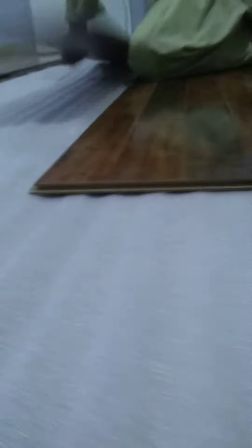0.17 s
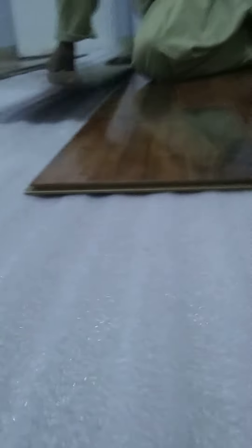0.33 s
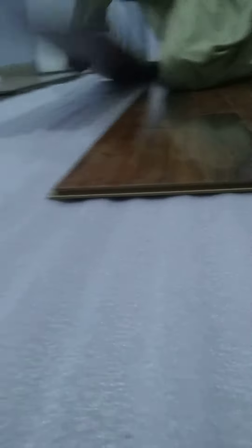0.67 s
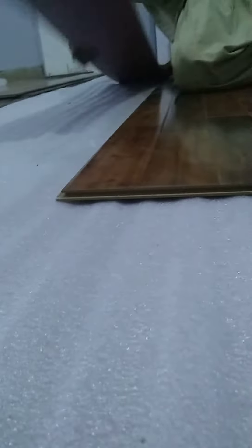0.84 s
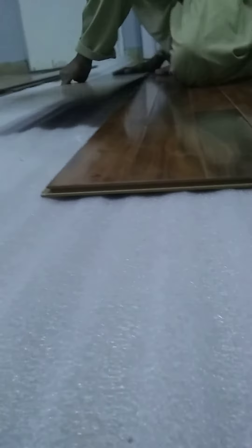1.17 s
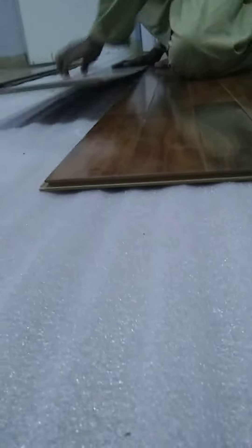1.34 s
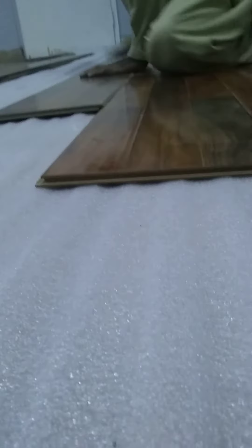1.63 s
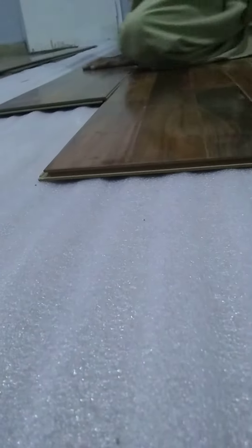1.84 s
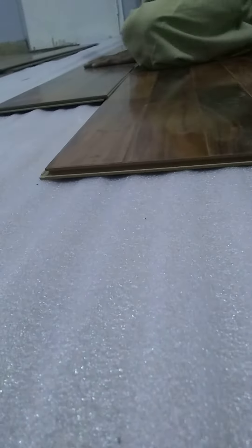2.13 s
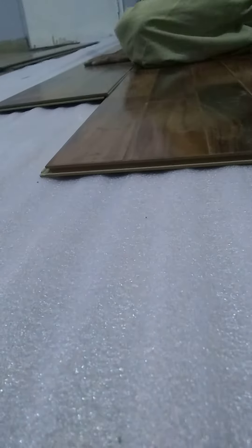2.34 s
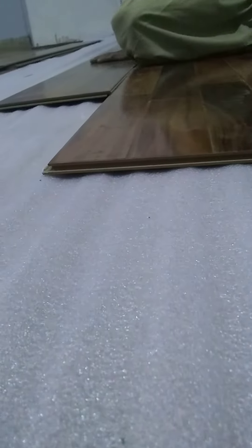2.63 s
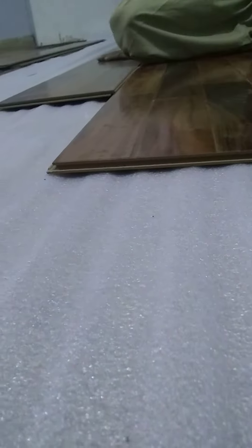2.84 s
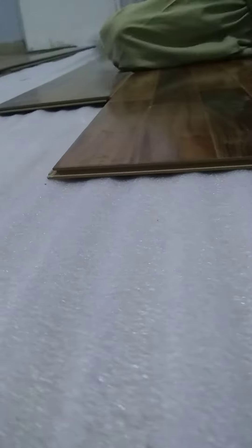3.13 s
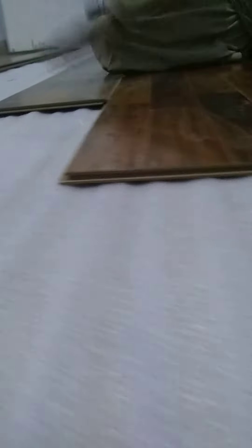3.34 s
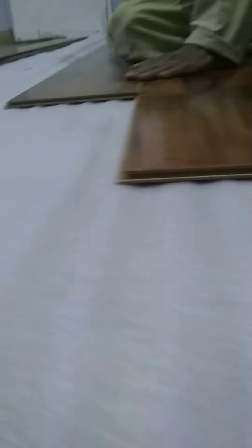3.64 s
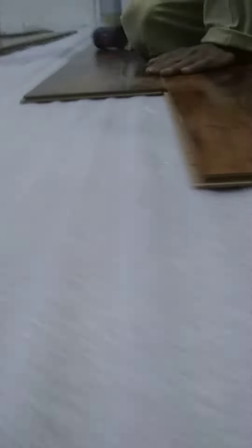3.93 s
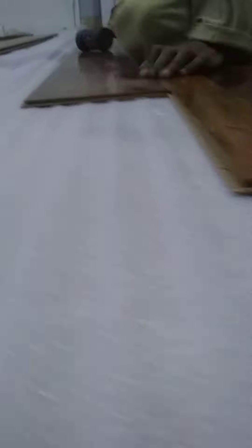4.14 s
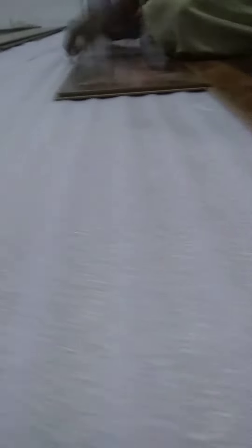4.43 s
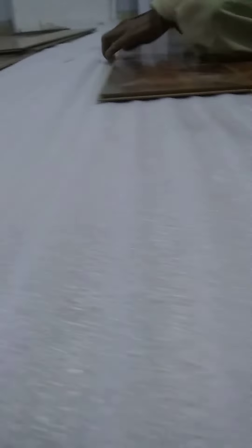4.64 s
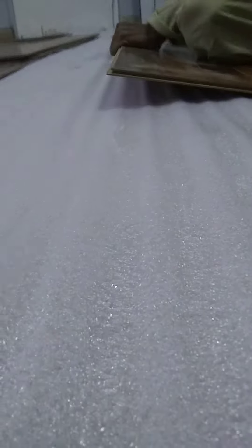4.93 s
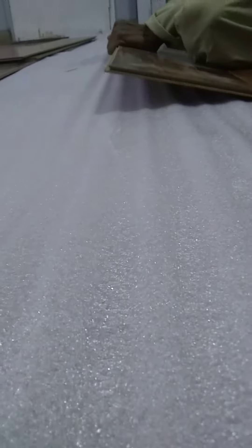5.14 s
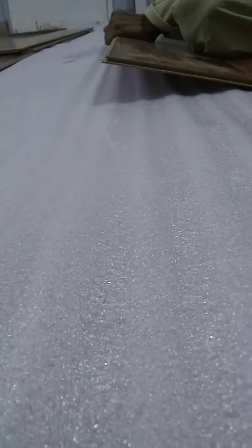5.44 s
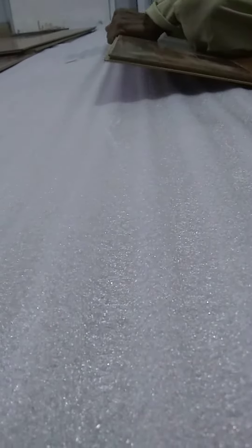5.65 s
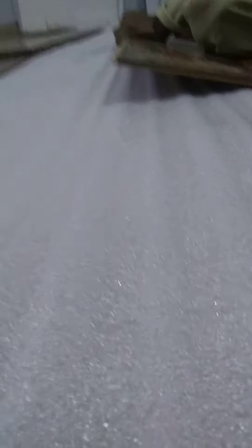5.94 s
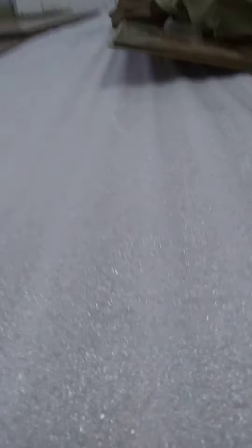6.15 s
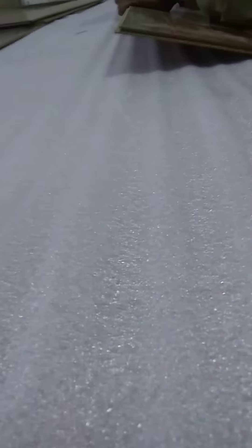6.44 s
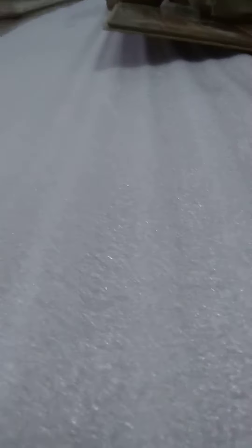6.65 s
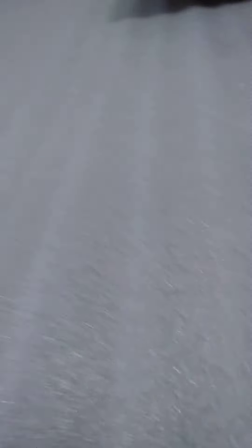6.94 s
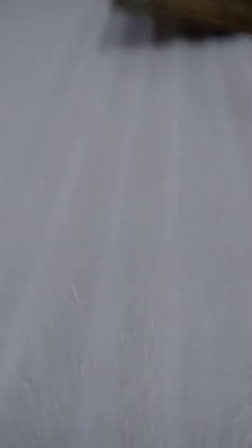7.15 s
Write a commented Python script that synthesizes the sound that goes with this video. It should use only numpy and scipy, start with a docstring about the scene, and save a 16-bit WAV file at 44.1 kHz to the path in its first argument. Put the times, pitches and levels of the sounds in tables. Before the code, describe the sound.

Scattered woody knocks on laminate planks ring briefly in an empty room, while foam swishes and crackles close by and the handheld microphone gets bumped.

```python
"""A hand or mallet knocks floorboards together on foam underlay in a bare, echoing room.
Blows: clicks of a wooden block plus decaying board modes, dispersed, echoed and level-set by range.
A lifted plank rings lower and longer; loose boards clatter, click and squeak.
Foam swishes (coloured noise) and crinkles (narrow noise snaps) close by; a dull background wash lies below.
A hand-held two-port phone hears it all; bumps, rumble and a finger's rub enter at one port."""
import sys
import numpy as np
from scipy import signal
from scipy.fft import rfft, irfft
from scipy.io import wavfile
from scipy.ndimage import uniform_filter1d

SR = 44100
rng = np.random.default_rng(int(sys.argv[2]) if len(sys.argv) > 2 else 0)


def put_to_file(sound):
    """Save the sound as 16-bit audio at rate SR, in the file named by the first command-line argument."""
    columns = np.atleast_2d(sound).T  # one column per channel
    safe = np.clip(columns, -1, 1)
    whole_steps = np.round(safe * 32767)
    wavfile.write(sys.argv[1], SR, whole_steps.astype(np.int16))


N = 321930
TIME_S = np.arange(N) / SR
BIN_HZ = np.maximum(np.arange(N // 2 + 1) * SR / N, 1)

# Table levels are relative: each layer's gain and the phone follow.
# Building background level: [time_s, level_db]
BACKGROUND_LEVEL = [(0, -31.5), (.5, -33.5), (.8, -39), (1.0, -34.5), (2.4, -34), (4.8, -44), (5.05, -39),
                    (7.3, -47.5)]
# Background spectrum: [freq_hz, gain_db]
BACKGROUND_COLOUR = [(40, -17), (90, -7), (170, 3), (300, 4), (420, -1), (560, -1), (900, -6), (1500, -12),
                     (2600, -20), (5000, -25), (14000, -30)]

# Jolts of the phone by fingers and floor: [start_s, peak_db]
BUMPS = [(0.013, -16), (0.158, -8.5), (0.206, -12), (0.245, -4.5), (1.149, -31), (1.32, -16.5),
         (1.414, -14), (1.598, -19), (1.688, -17.5), (1.792, -15), (2.861, -24), (4.368, -27.5),
         (4.827, -29), (6.114, -3.5)]
# Finger drag on the case: [start_s, rise_s, hold_s, fall_s, level_db]
RUB = (0.145, 0.02, 0.19, 0.05, -34)

# Single foam crinkles, loud and soft: [start_s, peak_db, pitch_hz]
SINGLE_CRINKLES = [(0.15, -13, 6200), (0.477, -22, 9500), (0.5369, -18, 9590), (0.6236, -19.5, 7700),
                   (0.6835, -16.5, 9900), (0.775, -26, 8500), (0.9615, -21, 9400), (1.409, -29, 8500),
                   (1.735, -21.5, 8500), (2.368, -18.5, 9400), (2.548, -14, 5900), (2.553, -18, 6800),
                   (3.7344, -7, 8050), (4.2996, -12, 7900), (4.6152, -22.5, 7800), (4.7602, -20, 8950),
                   (5.115, -32.5, 7900), (5.214, -27.5, 8600), (5.243, -32, 7000), (6.588, -24, 7000),
                   (6.6332, -2.5, 8300)]
# Denser runs of crinkles as foam creases under shifting weight: [start_s, end_s, rate_per_s, peak_db]
CREASING = [(0.601, 0.947, 45, -37), (1.09, 1.713, 31, -39), (1.334, 1.513, 40, -29),
            (2.188, 2.355, 40, -28.5), (2.763, 2.873, 86, -31), (3.299, 4.6, 28, -20),
            (5.082, 5.266, 40, -41), (6.553, 6.623, 45, -29)]
# Pitch range of crinkles in the runs: [low_hz, high_hz]
RUN_HZ = (6260, 10600)
RUN_SPREAD_DB = 5  # plus or minus

# Strokes of board, knee and cloth over foam: [start_s, rise_s, hold_s, fall_s, level_db]
STROKES = [(-0.05, 0.062, 0.29, 0.02, -48), (0.153, 0.015, 0.016, 0.083, -17.5),
           (0.159, 0.022, 0.19, 0.026, -26.5), (0.196, 0.042, 0.036, 0.54, -32.5),
           (0.59, 0.027, 0.037, 0.16, -40), (1.055, 0.18, 0.085, 0.14, -34.5),
           (1.25, 0.13, 0.21, 0.27, -39.5), (2.423, 0.048, 0.074, 0.088, -44.5),
           (2.718, 0.092, .02, 0.11, -42), (3.048, 0.21, 1.12, 0.015, -28),
           (3.048, 0.26, 1.27, 0.34, -28.5), (5.794, 0.29, 0.035, 0.084, -42.5),
           (6.352, 0.0091, 0.023, 0.37, -37.5), (6.482, 0.12, 0.072, 0.049, -35.5),
           (7.066, 0.029, 0.12, .1, -41), (7.122, 0.08, 0.046, 0.25, -34.5)]
# Foam swish spectrum: [freq_hz, gain_db]
SWISH_COLOUR = [(300, -10.5), (1200, -8), (3500, -8.5), (6000, -0.5), (8500, 1), (10000, -0.5), (12000, -5),
                (14500, -4.5)]
STROKE_DEPTH_DB = -19.5  # level change per rise or fall time
FOAM_REST_DB = -60  # floor of the foam's motion

# Board edge squeaking in the groove: [start_s, rise_s, hold_s, fall_s, level_db]
SQUEAK = (2.44, .014, .04, .012, -45)
SQUEAK_HZ = 1940
# Squeak harmonics from the fundamental up: [level_db]
SQUEAK_HARMONICS = (-1, 3, -2)
# Board edges clicking together: [start_s, peak_db, pitch_hz]
CLICKS = [(0.372, -39, 2980), (1.408, -30, 3800), (1.4175, -36, 3560), (1.475, -19.5, 4660),
          (2.325, -29.5, 3950), (2.56, -26.5, 3270), (4.426, -23, 3200), (4.83, -35, 3920),
          (5.014, -39, 4000), (5.648, -14, 2660), (6.3438, -19.5, 3500)]

# Loose board set down, nudged, hitting its neighbour:
# [start_s, pitch_hz, level_db, thump_db, clack_db, hardness_db, direct_db]
CLATTERS = [(0.235, 518, -26.5, -9.5, -3, 0, 15), (0.290, 557, -30.5, -15, -8, 0, 24),
            (0.975, 424, -41, -9, -23, -7, -1), (1.200, 604, -26, -14.5, -4, 0.5, 8.5),
            (1.228, 614, -37, -1, -5, -15, 13), (1.256, 514, -41, 4.5, 4, 13.5, -3),
            (1.380, 482, -26, -20, -2.5, 2.5, 9.5), (1.408, 455, -29, -29, -4.5, -1, 7),
            (1.418, 578, -32, -14, -7.5, 12, 2.5), (4.87, 423, -49, -3, -10, 0, 0),
            (5.03, 504, -43.5, -6, -24, -22, 6)]
# Blows on a plank held clear of the foam:
# [start_s, pitch_hz, level_db, thump_db, clack_db, hardness_db, direct_db]
LIFTED_KNOCKS = [(5.3668, 351, -14.5, -4.5, -10.5, -3.5, 8), (5.505, 337, -26.5, -24, -7, -19, 17),
                 (5.638, 336.4, -16, -5, -10, -6, 8.5), (6.368, 383, -18, -10.5, -13, -8, -4)]
# Blows and rebounds on laid boards:
# [start_s, pitch_hz, level_db, thump_db, clack_db, hardness_db, direct_db]
KNOCKS = [(1.8222, 482, -15, -22.5, -13.5, 9.5, 2), (1.865, 476, -23.5, -13, -15, 0, 8),
          (2.233, 496, -30, -17, -40.5, -3, 1), (2.523, 461, -14, -13, -15, -6.5, -7),
          (2.593, 517, -18, -37, -13.5, -10.5, 8.5), (2.9003, 490, -14.5, -8, -10.5, 3.2, 7),
          (2.992, 592, -22, -16, -12, -5, 6), (3.102, 510, -33.5, -18, -14, -15, 7),
          (3.609, 498, -16.5, -5, -9, 1.5, 7), (5.660, 496, -23.5, -7, 0, 10.5, -4.5),
          (5.689, 570, -29.5, -32, -1, -6, 3), (6.111, 452, -9.5, -15, -10, 3, 5.5),
          (6.272, 547, -32, -25, -7, 3, 2), (6.325, 476, -25.5, -9, -3.5, -1, -4)]
# Modes of a plank in the air: [pitch_multiple, level_db, t60_s]
PLANK_MODES = [(.46, -31, 0.038), (.7, -4, 0.085), (.86, -11, 0.04), (1.002, 3.5, .06), (1.14, 5.5, 0.023),
               (1.38, 4, 0.017), (1.64, -14.5, .13), (1.75, -7, 0.097), (2.33, -21, 0.036),
               (3.0, 8, 0.0022)]
# Modes of a foam-damped board: [pitch_multiple, level_db, t60_s]
BOARD_MODES = [(.38, -44, 0.0086), (.6, -0.5, 0.037), (.84, -18, 0.055), (1, 12.5, 0.019),
               (1.27, 8.5, 0.018), (1.7, 9, 0.0083), (2.15, -18.5, 0.27), (3.0, 10.5, 0.0023)]
# Modes of the tapping block: [freq_hz, level_db, t60_s]
BLOCK_MODES = [(1800, -10, .004), (3200, -14, .004), (3850, -7.5, .007)]
# Edges of the thump, board, clack, tick and crack ranges: [freq_hz]
RANGE_EDGES_HZ = [118, 280, 850, 2000, 4600, 15000]
# Top ranges against the board's note, at hardness 0, for blows: [tick_db, crack_db]
BLOW_TOP_DB = (-15.5, -20)
# The same for loose boards: [tick_db, crack_db]
LOOSE_TOP_DB = (-10.5, -37)
# Harder contact is shorter and lifts the top: [tick_db_per_db, crack_db_per_db]
HARDNESS_LIFT = (0.92, 1.06)
EDGE_DB, EDGE_LIFT_DB_PER_DB = 0, 0.52  # direct sound's edge at hardness 0, and its growth
BEND_S = .0021  # bending-wave delay at 1 kHz, before the delay at TOP_HZ is taken off

# Room decay: [centre_hz, t60_s]
ROOM_T60 = [(110, 2.05), (250, 1.78), (520, 1), (1800, 0.81), (6000, 0.82), (14000, 0.3)]
# Standing waves between the walls: [freq_hz, level_db, t60_s]
STANDING_WAVES = [(121.7, -65, 6.7), (133.7, -70, 5.6), (168, -72.5, 11.2), (214, -67, 6),
                  (251.6, -68.5, 3), (325.8, -68, 3.3), (368.2, -65.5, 2.5), (399.6, -72.5, 2.1),
                  (382.7, -53.5, 0.33), (437, -49.5, 0.56), (498, -56.5, 0.43), (563, -55.5, 0.89),
                  (653, -63.5, 0.71), (1418, -60.5, 1.2)]
CEILING_S, CEILING_DB = .0128, -3.5  # first strong echo; nominal time
MERGE_S, BLOOM_DB, BLOOM_S = .005, 3, .035  # wall echoes: joining time, early boost and its decay constant

# Port colour: [freq_hz, gain_db]
PORT_COLOUR = [(220, 0), (290, -0.5), (380, 1.5), (1050, 1.5), (1650, 0), (1950, -0.5), (2300, -5.5),
               (2800, 2.5), (4400, -1.5), (9000, 0.5), (14000, -7)]
# Share of the other port subtracted, later capped at 0 dB: [freq_hz, gain_db]
CROSS = [(600, -1.5), (1120, -3.5), (1900, -4), (3500, 33), (5600, -7.5), (8000, -12), (14000, -15)]
PORT_LAG_S = 19.6 / SR
TOP_HZ = 14300


def undb(db):
    """Decibels to gain."""
    return 10 ** (np.asarray(db) / 20)


def curve(rows):
    """Rows of (s, value) joined by straight lines."""
    return np.interp(TIME_S, *np.transpose(rows))


def at_hz(rows, hz):
    """Rows of (Hz, value) read on a log-frequency axis."""
    points, values = np.transpose(rows)
    return np.interp(np.log(hz), np.log(points), values)


def unit(x):
    """Scale to rms 1."""
    return x / np.sqrt(np.mean(x ** 2))


def band(x, low_hz, high_hz, order=3):
    """Causal band-pass."""
    sos = signal.butter(order, [low_hz, min(high_hz, .45 * SR)], "band", fs=SR, output="sos")
    return signal.sosfilt(sos, x + 1e-18)


def colour(x, rows):
    """Shape a full-length sound by rows of (Hz, dB)."""
    return irfft(rfft(x) * undb(at_hz(rows, BIN_HZ)), N)


def fade(t, t60_s):
    """Exponential decay, 60 dB down after t60_s."""
    return np.exp(-np.log(1000) * t / t60_s)


def ring(modes, t, scale=1, jitter=0.036):
    """Decaying sine modes, each detuned at random by a relative jitter."""
    out = 0
    for hz, db, t60_s in modes:
        detuned_hz = hz * scale * (1 + jitter * rng.standard_normal())
        out = out + undb(db) * fade(t, t60_s) * np.sin(2 * np.pi * detuned_hz * t)
    return out


def add(out, start_s, sound):
    """Mix a sound in at start_s."""
    start = max(int(start_s * SR), 0)
    part = sound[..., :out.shape[-1] - start]
    out[..., start:start + part.shape[-1]] += part


def walk(rate_hz, size=N):
    """Random levels held 1 / rate_hz and smoothed twice; rms 1."""
    hold = int(SR / rate_hz)
    steps = np.repeat(rng.standard_normal(size // hold + 1), hold)
    smooth = uniform_filter1d(uniform_filter1d(steps, hold), hold)
    return unit(smooth[:size])


def stroke(start_s, rise_s, hold_s, fall_s, db):
    """Gain of one sliding movement: rises, holds and falls linearly in dB."""
    before = 1 - (TIME_S - start_s) / max(rise_s, .005)
    after = (TIME_S - start_s - rise_s - hold_s) / max(fall_s, .005)
    return undb(db + STROKE_DEPTH_DB * np.clip(np.maximum(before, after), 0, 10))


def diffuse(size, spacing_s=0.00046):
    """Noise from all sides at two ports: alike in the bass, unrelated in the treble."""
    likeness = np.sinc(2 * spacing_s * np.arange(size // 2 + 1) * SR / size)
    mid, side = rfft(rng.standard_normal((2, size)))
    mid = mid * np.sqrt((1 + likeness) / 2)
    side = side * np.sqrt((1 - likeness) / 2)
    return irfft(np.array([mid + side, mid - side]), size)


def background(waver_db=1.5):
    """Dull wash from the rest of the building: coloured diffuse noise, wavering in level."""
    return unit(colour(diffuse(N), BACKGROUND_COLOUR)) * undb(curve(BACKGROUND_LEVEL) + waver_db * walk(8))


def echoes(size=65536, far_db=-18, far_t60_s=1.95, single_db=7, merge_s=0.026):
    """Dense wall echoes at both ports: the treble mostly dies first, each band comes in uneven clumps."""
    t = TIME_S[:size]
    hz = np.maximum(np.arange(size // 2 + 1) * SR / size, 1)
    # early echoes stand out singly, then merge
    spikes = undb(single_db * np.exp(-t / merge_s) * walk(2500, size))
    spikes = spikes / np.sqrt(uniform_filter1d(spikes ** 2, size=882))
    noise = rfft(diffuse(size) * spikes)
    centres = np.log(np.array(ROOM_T60)[:, 0])
    tail = 0
    for share, (centre_hz, t60_s) in zip(np.eye(len(ROOM_T60)), ROOM_T60):
        clump_db = np.interp(centre_hz, [700, 4000], [1.8, .8])
        clumps = undb(clump_db * walk(60, size))
        part = irfft(noise * np.interp(np.log(hz), centres, share), size)
        tail = tail + part * fade(t, t60_s) * clumps
    # neighbouring rooms return a duller, longer tail
    far = band(diffuse(size), 152, 515, order=2) * fade(t, far_t60_s)
    return tail + undb(far_db) * far


def room(direct_db, edge_db=0, size=65536, early_db=-9, near_db=-8, beam_db=6, lag_s=0.0002):
    """Impulse response to both ports: direct sound, ceiling echo, wall echoes, standing waves."""
    t, pulse = TIME_S[:size], signal.unit_impulse(size)
    # few wall echoes precede the ceiling's; the strongest follow it
    tail = echoes(size) * np.interp(t, [CEILING_S, CEILING_S + MERGE_S], [undb(early_db), 1])
    tail = tail / np.sqrt(np.sum(tail[0] ** 2))
    path = tail * undb(BLOOM_DB * np.exp(-t / BLOOM_S)) + ring(STANDING_WAVES, t, jitter=0.0018)
    ceiling = undb(CEILING_DB) * band(pulse, 180, 900, order=2)
    add(path, CEILING_S * rng.uniform(.95, 1.05), ceiling)
    # direct sound: a thud plus a sharp edge with its own level
    thud = band(pulse, 193, 1050, order=2)
    edge = band(pulse, 1950, 5300, order=4)
    direct = undb(near_db + direct_db) * (thud + undb(beam_db + edge_db) * edge)
    add(path[1], 0, direct)
    add(path[0], lag_s, undb(-10.5) * direct)
    return path


def handling(gain_db=-5, hz=115, t60_s=0.15, scuff_db=-24, rumble_db=-56, unrest_db=4, size=4096):
    """Dull bumps, each with a scuff of skin, and a restless case rumble, at one port only."""
    out, t = np.zeros((2, N)), TIME_S[:size]
    for start_s, db in BUMPS:
        touch = rng.standard_normal(size) * fade(t, t60_s)
        scuff = undb(scuff_db) * band(touch, 580, 2700, order=2)
        bump = band(touch, hz / 2, hz * 3.0, order=2) + scuff
        add(out[0], start_s, undb(db + gain_db) * bump / np.abs(bump).max())
    rumble = unit(band(rng.standard_normal(N), 49, 82, order=2))
    out[0] += rumble * undb(rumble_db + unrest_db * walk(3.67))
    return out


def rub(grain_db=4):
    """A finger drags over the case: rough stick-slip noise, at one port only."""
    grains = rng.standard_normal(N) * undb(grain_db * walk(400))
    rasp = unit(band(grains, 660, 2200, order=2))
    return np.array([rasp * stroke(*RUB), np.zeros(N)])


def crinkles(gain_db=2.5, t60_s=0.011, width=1.26, far_port_db=-3, size=1024):
    """Foam cells snap by the phone: narrow noise bursts, single ones and denser runs."""
    out = np.zeros((2, N))
    runs = []
    for start_s, end_s, per_s, db in CREASING:
        for when, force, pitch in rng.random((int(per_s * (end_s - start_s)), 3)):
            runs.append((start_s + when * (end_s - start_s),
                         db + RUN_SPREAD_DB * (2 * force - 1),
                         np.interp(pitch, [0, 1], RUN_HZ)))
    for start_s, db, hz in SINGLE_CRINKLES + runs:
        burst = rng.standard_normal((2, size)) * fade(TIME_S[:size], t60_s)
        snap = band(burst, hz / width, hz * width, order=1)
        add(out, start_s, undb(db + gain_db) * undb([[0], [far_port_db]]) * snap / np.abs(snap).max())
    return out


def slide(gain_db=3.0, grain_db=4, flutter_db=0.96, far_port_db=-3):
    """Foam cells catch and let go: grainy coloured noise, nearer one port, with uneven edge scraping."""
    cells = rng.standard_normal((2, N // 8 + 1)).repeat(8, axis=1)[:, :N]
    grains = rng.standard_normal((2, N)) * undb(grain_db * cells)
    swish = unit(colour(grains, SWISH_COLOUR)) * undb([[0], [far_port_db]])
    catching = undb(1.1 * walk(22) + 2 * walk(160) - 1)
    swish = swish + band(swish, 1900, 6300, order=1) * (catching - 1)
    motion = np.sqrt(undb(FOAM_REST_DB) ** 2 + sum(stroke(*row) ** 2 for row in STROKES))
    return swish * motion * undb(gain_db + flutter_db * walk(35))


def squeak(rough=.06, direct_db=4):
    """Tongue slips in groove: a short, hoarse stick-slip note in the room."""
    phase = 2 * np.pi * np.cumsum(SQUEAK_HZ * (1 + rough * walk(900))) / SR
    note = unit(sum(undb(db) * np.sin(k * phase) for k, db in enumerate(SQUEAK_HARMONICS, 1)))
    return signal.fftconvolve((note * stroke(*SQUEAK))[None], room(direct_db), axes=1)[:, :N]


def clicks(gain_db=-4, t60_s=0.024, width=1.12, direct_db=10, size=2048):
    """Tongue and groove touch: short, narrow-band wooden ticks in the room."""
    out = np.zeros(N)
    for start_s, db, hz in CLICKS:
        burst = rng.standard_normal(size) * fade(TIME_S[:size], t60_s)
        tick = band(burst, hz / width, hz * width, order=2)
        add(out, start_s, undb(db + gain_db) * tick / np.abs(tick).max())
    return signal.fftconvolve(out[None], room(direct_db), axes=1)[:, :N]


def bend(x):
    """Bending-wave dispersion: the treble arrives first and the knock sweeps downwards."""
    hz = np.arange(len(x) // 2 + 1) * SR / len(x)
    # phase whose group delay is BEND_S * sqrt(1000 / hz), less its value at TOP_HZ
    cycles = BEND_S * (2 * np.sqrt(1000 * hz) - hz * np.sqrt(1000 / TOP_HZ))
    return irfft(rfft(x) * np.exp(-2j * np.pi * cycles), len(x))


def rebalance(sound, levels_db, size):
    """Steer each range of a blow towards its level with one minimum-phase filter; the attack stays sharp."""
    length = sound.shape[-1]
    hz = np.maximum(np.arange(length // 2 + 1) * SR / length, 1)
    power = 1e-9
    for low_hz, high_hz, db in zip(RANGE_EDGES_HZ, RANGE_EDGES_HZ[1:], levels_db):
        gain = undb(db) / np.std(band(sound[:, :size], low_hz, high_hz, order=4))
        detuning = (hz - low_hz * high_hz / hz) / (high_hz - low_hz)
        power = power + gain ** 2 / (1 + detuning ** 8)
    # folded cepstrum of the power gives the minimum phase
    cepstrum = irfft(np.log(power))[:length // 2]
    return irfft(rfft(sound) * np.exp(rfft(cepstrum, length) - cepstrum[0] / 2))


def knocks(blows, modes, top_db, jitter, crack_db=15, crack_top_hz=7500, size=8820):
    """Block click and board modes, dispersed by bending waves; the room rings on."""
    out, t = np.zeros((2, N)), TIME_S[:size]
    crack = undb(crack_db) * band(signal.unit_impulse(size), 690, crack_top_hz, order=2)
    for start_s, hz, level_db, thump_db, clack_db, hardness_db, direct_db in blows:
        block = ring(BLOCK_MODES, t, jitter=0.03)
        board = ring(modes, t, scale=hz, jitter=jitter)
        blow = bend(crack + block + board)
        path = room(direct_db, EDGE_DB + EDGE_LIFT_DB_PER_DB * hardness_db)
        heard = signal.fftconvolve(path, blow[None], axes=1)
        # contact point and hardness set the balance from thump to crack
        tick_crack_db = np.array(top_db) + hardness_db * np.array(HARDNESS_LIFT)
        balance_db = np.array([thump_db, 0, clack_db, *tick_crack_db])
        add(out, start_s, rebalance(heard[:, :2 ** 16], level_db + balance_db, size // 2))
    return out


def scene():
    """Everything as it reaches the two ports."""
    laid = knocks(KNOCKS, BOARD_MODES, BLOW_TOP_DB, jitter=0.03)
    lifted = knocks(LIFTED_KNOCKS, PLANK_MODES, BLOW_TOP_DB, jitter=0.0065)
    loose = knocks(CLATTERS, BOARD_MODES, LOOSE_TOP_DB, jitter=0.027)
    boards = laid + lifted + loose + clicks() + squeak()
    foam = slide() + crinkles()
    return boards + foam + handling() + rub() + background()


def record(dry, lift_hz=360, gain_db=-3.0, knee=4):
    """Each channel subtracts the delayed other port for width; bass lifted, peaks rounded, top cut."""
    ports = rfft(dry) * undb(at_hz(PORT_COLOUR, BIN_HZ))
    # the case slightly colours the second port
    ports[1] *= undb(at_hz([(300, 0.0064), (2000, 0.13), (8000, -0.37)], BIN_HZ))
    cross = undb(np.minimum(at_hz(CROSS, BIN_HZ), 0)) * np.exp(-2j * np.pi * BIN_HZ * PORT_LAG_S)
    lift = (lift_hz + 1j * BIN_HZ) / (60 + 1j * BIN_HZ)
    difference = irfft((ports - cross * ports[::-1]) * lift, N)
    wide = undb(gain_db) * band(difference, 43, 21000, order=2)
    rounded = wide / (1 + np.abs(wide / 3.6) ** knee) ** (1 / knee)
    return signal.sosfilt(signal.ellip(14, .1, 80, TOP_HZ, fs=SR, output="sos"), rounded)


dry = scene()
out = record(dry)
put_to_file(out)
```